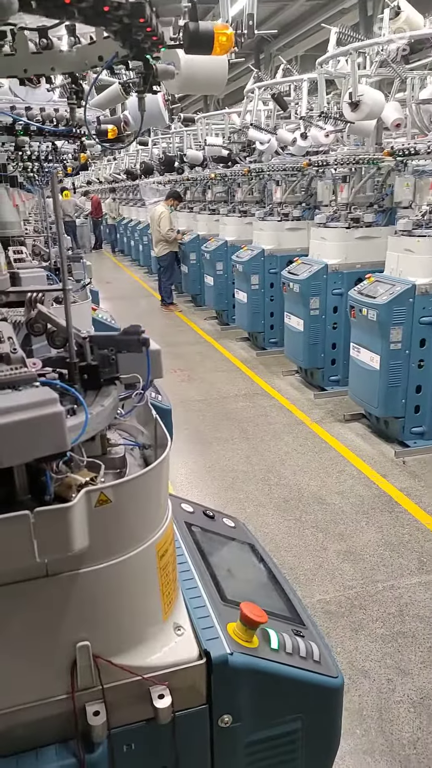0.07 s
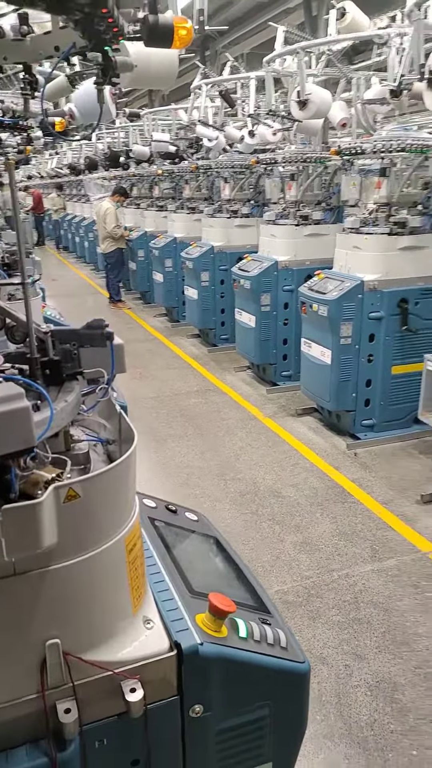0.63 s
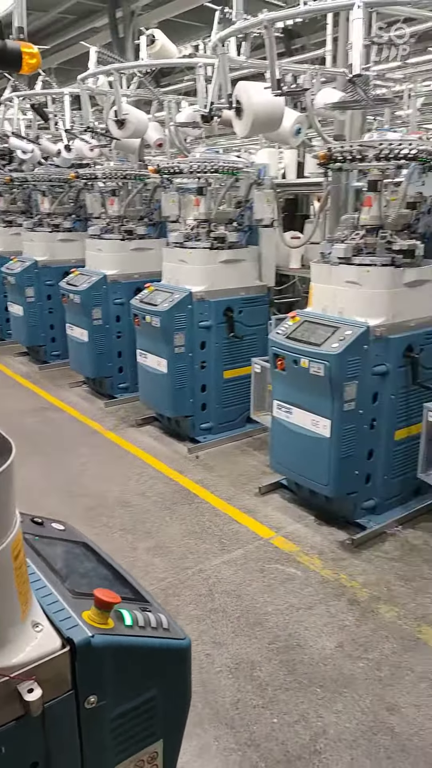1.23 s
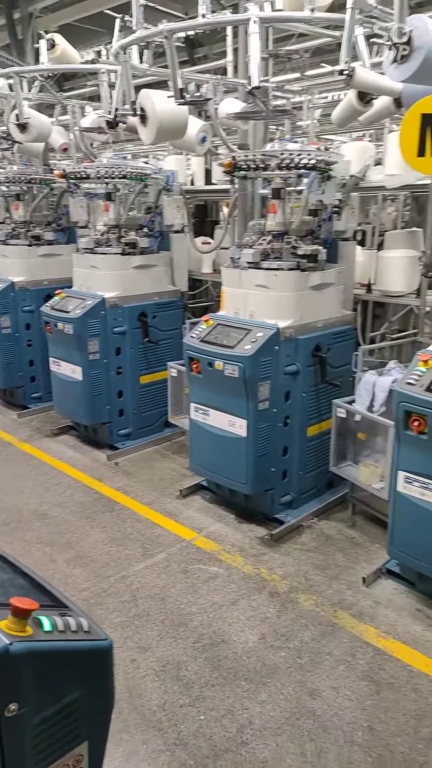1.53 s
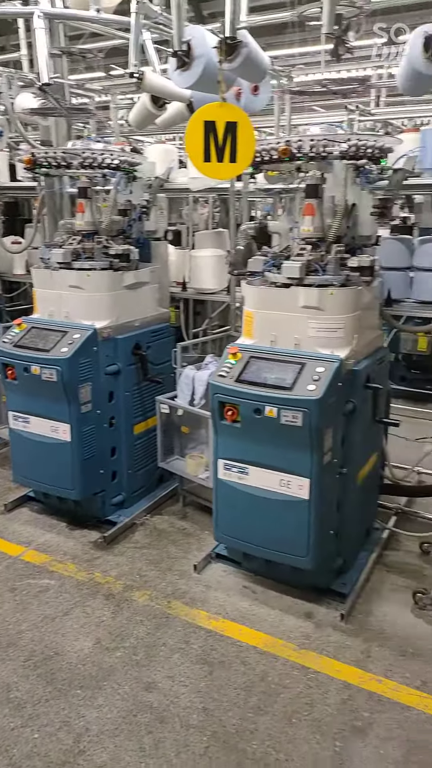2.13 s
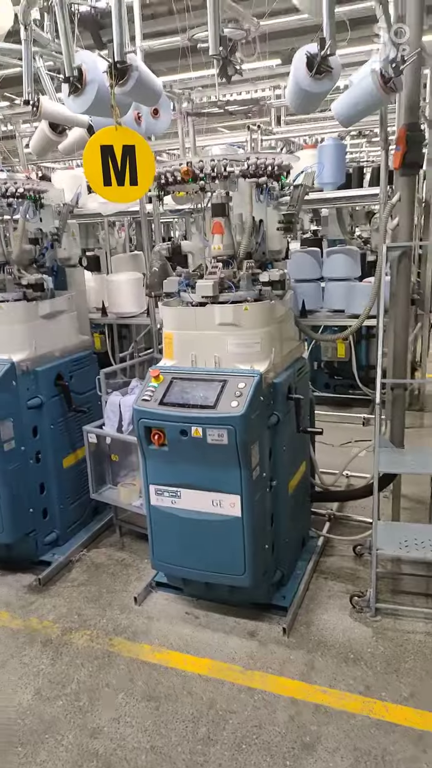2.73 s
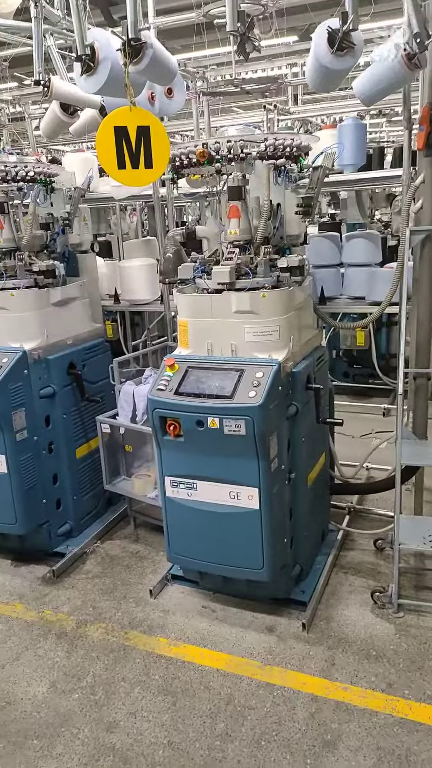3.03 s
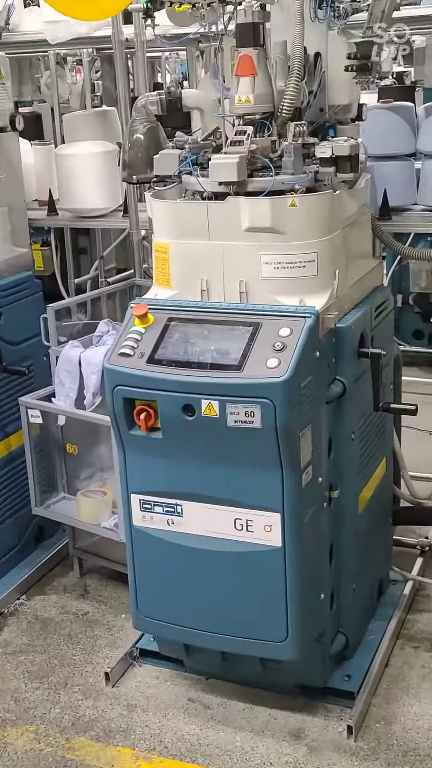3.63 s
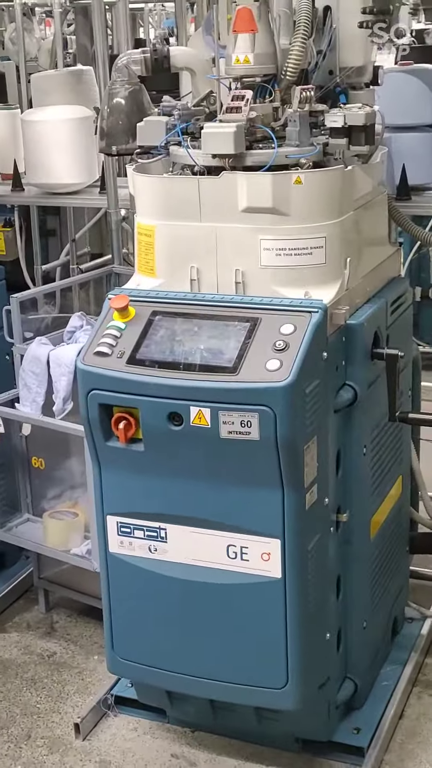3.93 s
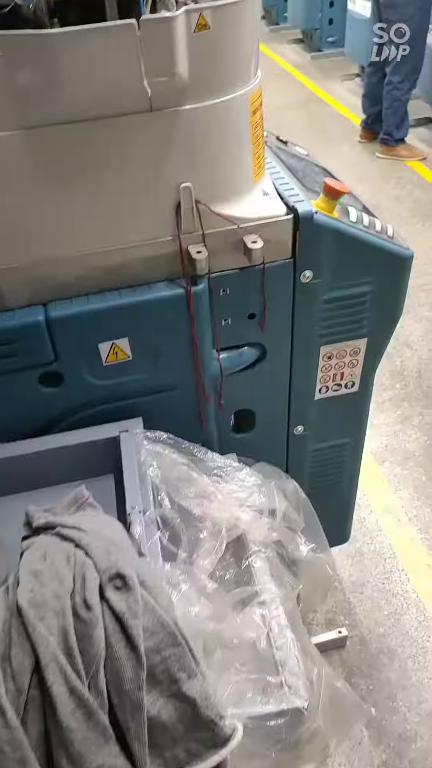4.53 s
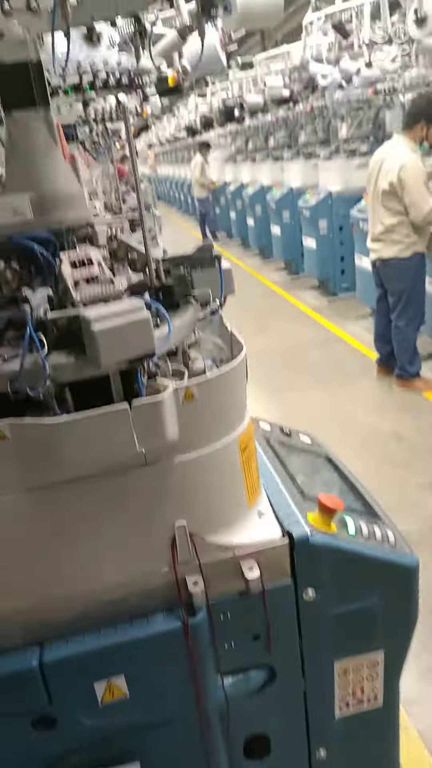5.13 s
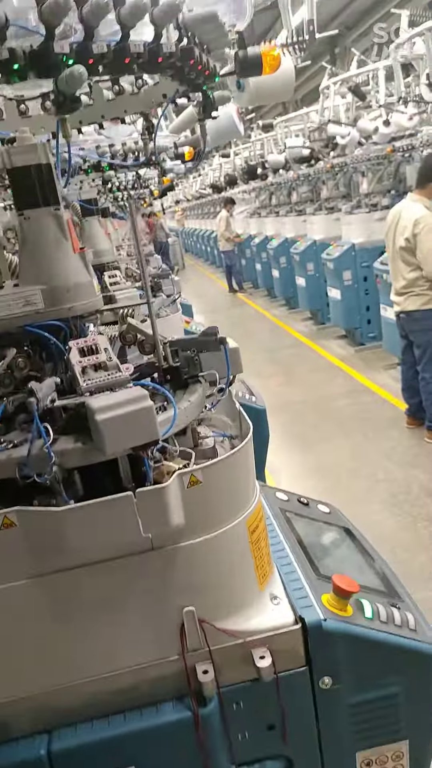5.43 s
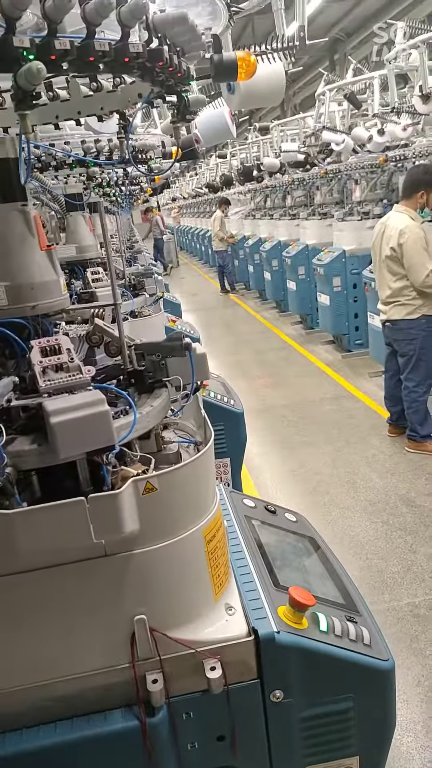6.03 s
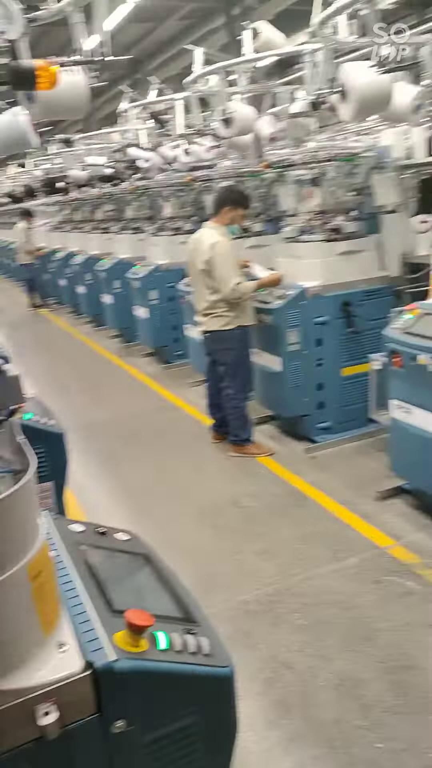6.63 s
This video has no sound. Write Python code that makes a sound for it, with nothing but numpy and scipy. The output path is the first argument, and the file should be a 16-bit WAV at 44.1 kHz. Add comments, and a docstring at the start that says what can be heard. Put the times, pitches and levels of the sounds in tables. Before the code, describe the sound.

A dense factory din of rattling needles, suction air and rumbling drives cuts out briefly, then resumes beside a whining fan.

```python
"""Factory hall with rows of circular knitting machines. Needles rattle and clink on steel cams, suction
air hisses, drives hum and rumble, far rows merge into a din with a few dull thuds. Rattle and hiss
pulse with the nearest cylinder; air valves open now and then. The sound cuts out briefly and fades
back in at a second spot, beside one machine whose suction fan whines."""
import sys
import numpy as np
from scipy import signal
from scipy.fft import rfft, irfft, next_fast_len
from scipy.io import wavfile
from scipy.ndimage import uniform_filter1d, map_coordinates

SR = 44100
rng = np.random.default_rng(int(sys.argv[2]) if len(sys.argv) > 2 else 0)


def wav_record(signal):
    """Record a signal, one row per channel, as 16-bit PCM in the file named by sys.argv[1]."""
    frames = np.transpose(np.atleast_2d(signal))
    bounded = np.clip(frames, -1, 1)
    # unit amplitude maps onto the largest positive 16-bit level
    quanta = np.round(bounded * 32767).astype(np.int16)
    wavfile.write(sys.argv[1], SR, quanta)


N = 299439
TIME_S = np.arange(N) / SR
MOVE_S = 4.45  # second spot takes over

# Needle contacts, near machines: tick_hz, turn_hz, level_db
NEAR_MACHINES = [(55.5, 3.7, -6), (49.1, 4.1, -8), (188, 4.4, -1), (240.4, 3.9, -1.5), (261.5, 4.7, -.5),
                 (383.6, 3.4, -1)]
# Rattle spectrum: freq_hz, density_db
STEEL_SPECTRUM = [(700, -64), (1500, -10), (1900, -6), (2550, -3), (2950, -4), (3400, -1.8), (3950, -0.1),
                  (4550, -2), (5100, -6), (5600, -6), (6200, -7.5), (7000, -13), (7700, -16.5),
                  (8100, -63.5), (11000, -64)]
# Rattle colour, second spot: freq_hz, gain_db
SECOND_RATTLE_EQ = [(1500, 0.5), (2800, 1.9), (4000, 1.5), (5600, 2.5), (7000, 2.5), (8200, -7)]
# Slow levels, first spot: time_s, rattle_db, din_db, rumble_db
FIRST_LEVELS = [(0, -17.5, -22, -31), (0.4, -18, -22.5, -32), (0.75, -17, -22.5, -33.5),
                (1.0, -19, -22.5, -33.5), (1.2, -18, -23.5, -36.5), (1.42, -17.5, -22.5, -33),
                (2.3, -17, -21, -30.5), (2.68, -18.5, -23.5, -36.5), (2.88, -17.5, -23.2, -32),
                (4.0, -17.5, -23, -33.5)]
# Suction hiss spectrum: freq_hz, density_db
AIR_SPECTRUM = [(2000, -27), (5000, -43), (8000, 2.5), (9000, 4.5), (11200, 6.5), (13000, 4.5),
                (15500, 4.5)]
# Air valve openings: start_s, length_s, level_db
VALVE_BLASTS = [(0.0, 0.3, -39), (0.48, 0.45, -36), (0.72, 0.19, -34), (2.19, 0.46, -35.3),
                (2.33, 0.25, -35)]
# Spectrum of the far rows: freq_hz, density_db
DIN_SPECTRUM = [(180, -35.5), (300, -5), (500, -5), (650, -5.5), (950, -5.5), (1170, -3.5), (1460, -6.5),
                (1900, -5), (2400, -9), (3200, -8.5), (5000, -67)]
# Drive rumble spectrum: freq_hz, density_db
RUMBLE_SPECTRUM = [(15, -47.5), (40, -6), (65, -6), (100, -6), (130, -3.5), (155, -2), (185, -2),
                   (290, -1.5), (360, -20), (520, -37), (1200, -86)]
# Deepest band of the rumble: freq_hz, share
DEEP_BAND = [(60, 1), (130, 0)]
# Dip of that band, second spot: time_s, gain_db
DEEP_GAIN = [(4.0, 0), (4.52, -12), (4.8, -12), (4.92, -3), (6.55, -4), (6.7, -10)]
# Drive and fan tones, first spot: pitch_hz, width_hz, level_db
FIRST_TONES = [(37.8, 5.9, -44), (156, 21, -43.5), (203.7, 21, -42.5), (251.6, 12, -43.5), (314, 24, -51),
               (584, 14, -49), (642, 34, -43.5), (1162, 27, -44.5), (1902, 55, -34), (2600, 60, -36.5),
               (3120, 50, -35.5), (3826, 120, -36.5)]
# Thuds from the machine rows: peak_s, boom_db, knock_db
ROW_THUDS = [(0.59, -29, -20), (0.79, -45, -24.5), (2.41, -30.5, -27), (3.1, -28.5, -26.5),
             (3.87, -29.5, -22)]
# Drive and fan tones, second spot: pitch_hz, width_hz, level_db
SECOND_TONES = [(160, 11.6, -43), (1925, 50, -38)]
# Fan blade-rate harmonics: order, level_db
FAN_HARMONICS = [(1, -43), (2, -45), (3, -41.5), (4, -41), (5, -40), (6, -36), (7, -35.5), (8, -38.5),
                 (9, -42), (10, -43), (11, -51), (12, -56)]
# Fan gain as the microphone moves: time_s, blade_db, overtones_db
FAN_GAIN = [(4.55, 6, 0), (4.8, 8, 2.5), (5.0, 9.5, 7), (5.2, 9.5, 8.5), (5.35, 4, 6.5), (5.6, 1.5, 5),
            (6.05, 3.5, 5.5), (6.4, 0, 2), (6.79, -3, 5.5)]
# Left-right likeness of the hall sound: freq_hz, correlation
COHERENCE = [(60, .99), (170, .975), (260, .93), (480, .58), (800, .48), (1100, 0), (1500, -.1),
             (2300, .08), (3500, 0), (6500, 0), (10000, .3)]
# Colour of the two ports: freq_hz, left_minus_right_db
BALANCE = [(300, -.25), (600, .4), (1150, -1), (1600, .6), (2300, 1.6), (3000, -.8), (6300, -1.3),
           (9000, 1.2), (12000, 0)]
# Sink, dropout and fade-in: time_s, gain_db
DROPOUT = [(4.05, -3.5), (4.389, -7.5), (4.391, -36), (4.42, -91), (4.516, -88), (4.519, -19), (4.6, -10),
           (4.7, -5), (4.88, -2)]


def from_db(db):
    """Decibels to gain."""
    return 10 ** (np.asarray(db) / 20)


def unit_rms(x):
    """Scale to unit power."""
    return x / np.sqrt(np.mean(x ** 2) + 1e-20)


def gains(rows):
    """Each dB column of a time table as a gain per sample."""
    time_s, *columns = np.transpose(rows)
    return [from_db(np.interp(TIME_S, time_s, db)) for db in columns]


def per_bin(points):
    """Table at every FFT bin, over log frequency."""
    hz, value = np.transpose(points)
    bin_hz = np.fft.rfftfreq(next_fast_len(N), 1 / SR)
    return np.interp(np.log(bin_hz + 1), np.log(hz), value)


def filtered(x, response):
    """Apply a frequency response."""
    size = next_fast_len(N)
    return irfft(rfft(x, size) * response, size)[..., :N]


def by_spot(first, second):
    """Switch from first to second at MOVE_S."""
    return np.where(TIME_S > MOVE_S, second, first)


def drift(rate_hz):
    """Slow random wander, unit RMS."""
    hop, settle = 40, 2000
    r = np.exp(-2 * np.pi * rate_hz * hop / SR)
    noise = rng.standard_normal(N // hop + settle + 2)
    slow = unit_rms(signal.lfilter([1], [1, -2 * r, r * r], noise)[settle:])
    return np.interp(np.arange(N) / hop, np.arange(len(slow)), slow)


def patchy_noise(depth_db, rate_hz, patch_hz, ceiling=1):
    """Noise pair whose narrow bands swell and sink at random, a faint shimmer."""
    hz, time_s, cells = signal.stft(rng.standard_normal((2, N)), SR, nperseg=512)
    grid = np.meshgrid(hz / patch_hz, time_s * rate_hz, indexing="ij")
    swell = map_coordinates(rng.standard_normal((400, 600)), grid, order=3, mode="mirror")
    return signal.istft(cells * from_db(depth_db * np.minimum(swell, ceiling)), SR)[1][:, :N]


def diffuse(pair, spectrum):
    """Colour and mix two signals as two close ports hear a hall: alike in the bass. Unit RMS."""
    alike = per_bin(COHERENCE)
    mid, side = filtered(pair, from_db(per_bin(spectrum)) * np.sqrt([1 + alike, 1 - alike]))
    return unit_rms(np.array([mid + side, mid - side]))


def cylinder_pulse(swing_db, turn_hz=3.594, peak_s=.289):
    """Gain over each turn of the nearest cylinder: broad arch, brief sag."""
    arch = np.abs(np.cos(np.pi * turn_hz * (TIME_S - peak_s)))
    return from_db(2 * swing_db * (arch - 2 / np.pi))


def needles(tick_hz, turn_hz, uneven_db=1.0, swell_db=3.8, jitter=.012, width_hz=107, parts=12):
    """Needle butts hit the cams and ring small steel parts, harder once per cylinder turn."""
    passed = np.cumsum(tick_hz * (1 + jitter * drift(8))) / SR + rng.random()
    hits = np.flatnonzero(np.diff(np.floor(passed)))
    turn_db = swell_db * np.sin(2 * np.pi * (turn_hz * hits / SR + rng.random()))
    r = np.exp(-np.pi * width_hz / SR)
    rings = []
    for hz in np.linspace(1200, 7500, parts) + rng.uniform(-250, 250, parts):
        force = from_db(turn_db - uneven_db * rng.standard_normal(len(hits)))
        clicks = np.full(N, 1e-18)
        clicks[hits] = force * rng.choice([-1, 1], len(hits))
        rings.append(signal.lfilter([1, 0, -1], [1, -2 * r * np.cos(2 * np.pi * hz / SR), r * r], clicks))
    angles = rng.uniform(0, 2 * np.pi, parts)  # each part radiates its own way
    return unit_rms(np.array([np.cos(angles), np.sin(angles)]) @ rings)


def clinks(low_hz=1700, high_hz=6800, t60_s=.07, spread_db=6, count=4200):
    """Latches and sinkers strike at random; each rings with its own pitch and direction."""
    t = np.arange(int(t60_s * SR)) / SR
    decay = from_db(-60 * t / t60_s)
    out = np.zeros((2, N + len(t)))
    for when, pitch, strength, bearing in rng.random((count, 4)):
        hz = low_hz + pitch * (high_hz - low_hz)
        ring = from_db(spread_db * strength) * decay * np.sin(2 * np.pi * hz * t)
        angle, at = 2 * np.pi * bearing, int(when * N)
        out[:, at:at + len(t)] += np.outer([np.cos(angle), np.sin(angle)], ring)
    return unit_rms(out[:, :N])


def rattle(first_gain, second_db=-21, even_s=.09):
    """Near ticks and clinks half merge with the dense rush of all other machines."""
    near = unit_rms(sum(from_db(db) * needles(tick_hz, turn_hz) for tick_hz, turn_hz, db in NEAR_MACHINES))
    close = from_db(-7) * near + from_db(-6.5) * clinks()
    far = unit_rms(patchy_noise(depth_db=10, rate_hz=24, patch_hz=105, ceiling=.5))
    steel = diffuse(close + far, STEEL_SPECTRUM)
    power = uniform_filter1d(np.mean(steel ** 2, axis=0), int(even_s * SR))
    steel /= np.sqrt(power + 1e-12)  # steady, as a sum of very many parts
    return by_spot(first_gain * cylinder_pulse(swing_db=1.1) * steel,
                   filtered(steel, from_db(second_db + per_bin(SECOND_RATTLE_EQ))))


def suction(level_db=-35.5, flutter_db=.95, attack_s=.022, release_s=.02):
    """Fluttering air hiss; pulses with the cylinder at the first spot, jumps while a valve is open."""
    power = (from_db(level_db) * by_spot(cylinder_pulse(swing_db=1.5), 1)) ** 2
    for start_s, length_s, db in VALVE_BLASTS:
        age_s = TIME_S - start_s
        opening = np.clip(np.minimum(age_s / attack_s, 1 - (age_s - length_s) / release_s), 0, 1)
        power += (from_db(db) * opening) ** 2
    hiss = diffuse(patchy_noise(depth_db=6.5, rate_hz=24, patch_hz=200), AIR_SPECTRUM)
    return np.sqrt(power) * from_db(flutter_db * drift(22)) * hiss


def far_rows(first_gain, knock_gain, second_db=-25.5, flutter_db=.38):
    """Din of distant machines, heard only as reverberation; swells with each thud."""
    gain = by_spot(first_gain * cylinder_pulse(swing_db=.3), from_db(second_db))
    gain *= from_db(flutter_db * drift(9.9))
    din = diffuse(patchy_noise(depth_db=2, rate_hz=18, patch_hz=150.3), DIN_SPECTRUM)
    return np.hypot(gain, knock_gain) * din


def drive_rumble(first_gain, boom_gain, second_db=-34.5):
    """Reverberant drive noise; swells with each thud, less deep at the second spot."""
    gain = np.hypot(by_spot(first_gain, from_db(second_db)), boom_gain)
    rumble = gain * diffuse(patchy_noise(depth_db=2.5, rate_hz=20, patch_hz=86), RUMBLE_SPECTRUM)
    deep = filtered(rumble, per_bin(DEEP_BAND))
    return rumble - (1 - gains(DEEP_GAIN)[0]) * deep


def drive_hum(pitch_hz=155.8, wobble=.02093, level_db=-40):
    """Core of the drive hum: one wandering sine, alike at both ports."""
    phase = 2 * np.pi * np.cumsum(pitch_hz * (1 + wobble * drift(3.34))) / SR
    return from_db(level_db) * np.sqrt(2) * np.sin(phase)


def hall_tone(hz, width_hz):
    """Machine tone blurred by many paths through the hall; low ones reach both ports alike."""
    alike = np.interp(hz, *np.transpose(COHERENCE))
    phase = 2 * np.pi * hz * TIME_S
    cosine, sine = np.cos(phase), np.sin(phase)
    mid, side = [np.sqrt(share / 2) * (cosine * drift(width_hz / 2) + sine * drift(width_hz / 2))
                 for share in (1 + alike, 1 - alike)]
    return np.array([mid + side, mid - side])


def thuds(half_width_s=.071):
    """Boom and knock gains; the hall blurs each thud into a short swell."""
    return sum(np.outer(from_db([boom_db, knock_db]), np.exp(-((TIME_S - peak_s) / half_width_s) ** 2))
               for peak_s, boom_db, knock_db in ROW_THUDS)


def suction_fan(blade_hz=577.7, wobble=.00257, flutter_db=3, scatter_db=-4, rise_db_per_order=2.5):
    """Blade-rate harmonics at unsteady speed: low ones direct, high ones blurred by reflections."""
    phase = 2 * np.pi * np.cumsum(blade_hz * (1 + wobble * drift(11.9))) / SR
    blade_gain, overtone_gain = gains(FAN_GAIN)
    out = 0
    for order, db in FAN_HARMONICS:
        port_phase = np.outer([1, -1], rng.uniform(0, .98))
        direct = unit_rms(np.sin(order * phase + port_phase) * from_db(flutter_db * drift(5.6)))
        scatter_gain = from_db(scatter_db + rise_db_per_order * (order - 1.5))
        scattered = scatter_gain * hall_tone(order * blade_hz, width_hz=13 * order)
        gain = from_db(db) * (blade_gain if order == 1 else overtone_gain)
        out += gain * unit_rms(direct + scattered)
    return out


def bump(centre_s=4.875, half_width_s=.035, pitch_hz=35.8, level_db=-30):
    """Soft bump: a few slow swings of the microphone body."""
    t = TIME_S - centre_s
    return from_db(level_db) * np.exp(-(t / half_width_s) ** 2) * np.sin(2 * np.pi * pitch_hz * t)


def scene():
    """One hall, two spots: pulsing at the first, steady with a fan whine at the second."""
    rattle_gain, din_gain, rumble_gain = gains(FIRST_LEVELS)
    boom_gain, knock_gain = thuds()
    hall = rattle(rattle_gain) + far_rows(din_gain, knock_gain) + drive_rumble(rumble_gain, boom_gain)
    first = drive_hum() + sum(from_db(db) * hall_tone(hz, width_hz) for hz, width_hz, db in FIRST_TONES)
    second = sum(from_db(db) * hall_tone(hz, width_hz) for hz, width_hz, db in SECOND_TONES)
    second += suction_fan() + bump()
    return hall + suction() + by_spot(first, second)


def record(dry, cutoff_hz=15900):
    """Port colour, dropout between the spots, steep low-pass."""
    coloured = filtered(dry, from_db(np.outer([.5, -.5], per_bin(BALANCE))))
    lowpass = signal.ellip(12, .1, 80, cutoff_hz, fs=SR, output="sos")
    return signal.sosfilt(lowpass, coloured * gains(DROPOUT)[0])


dry = scene()
out = record(dry)
wav_record(out)
```